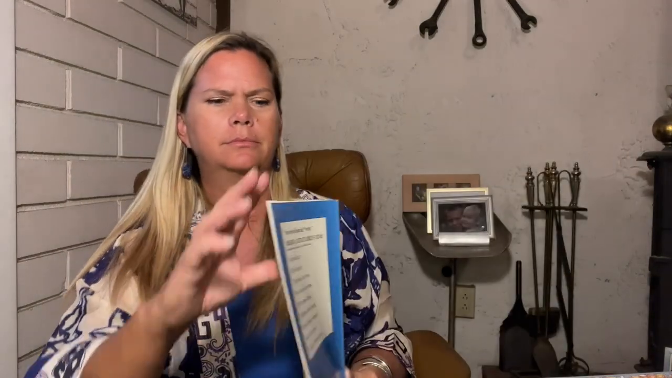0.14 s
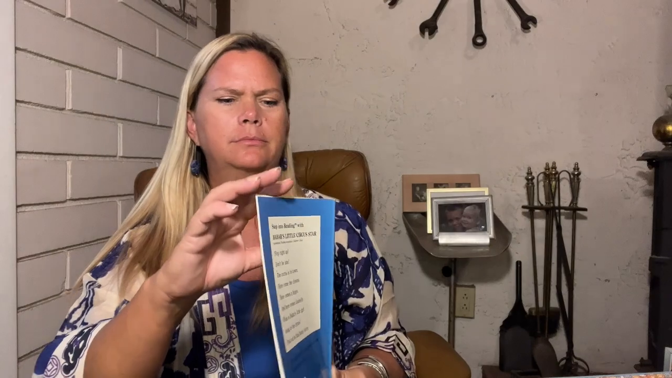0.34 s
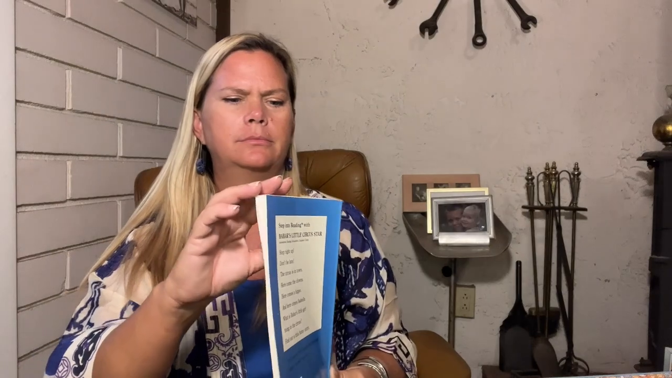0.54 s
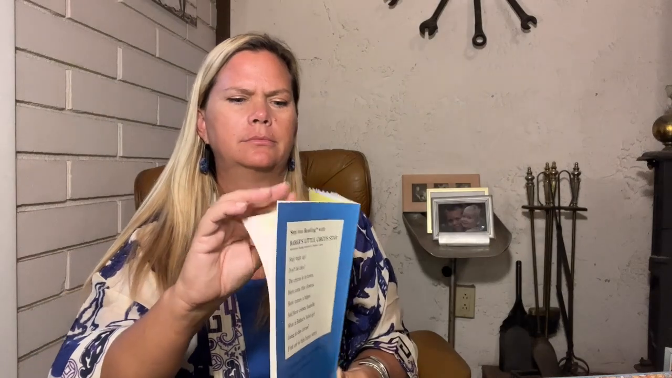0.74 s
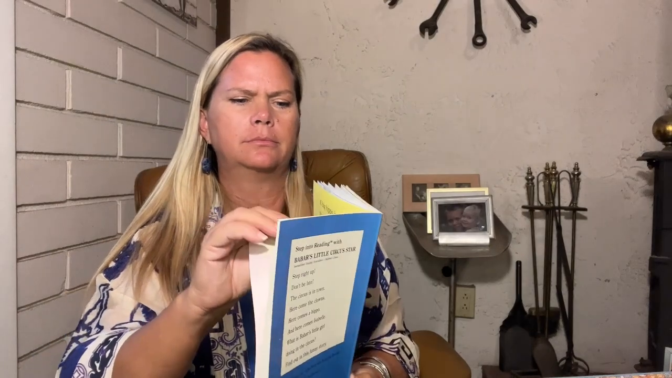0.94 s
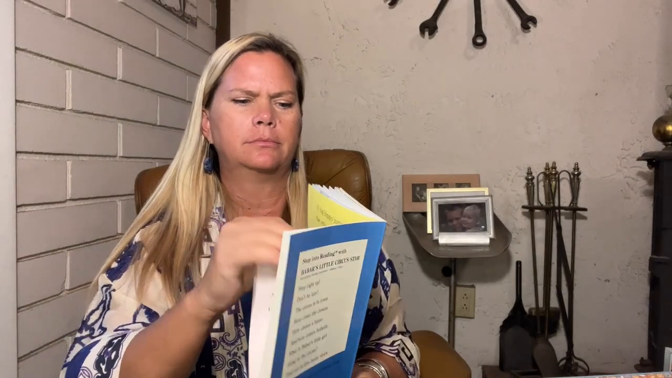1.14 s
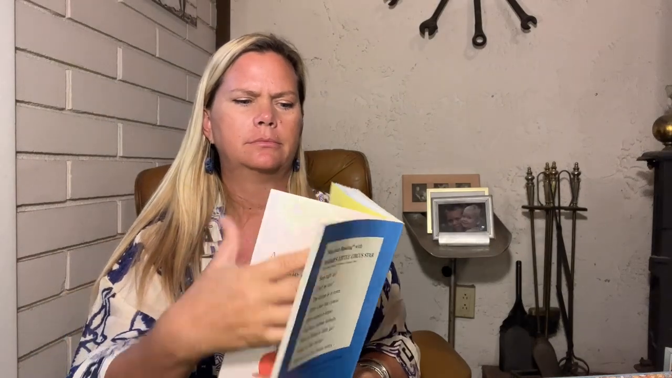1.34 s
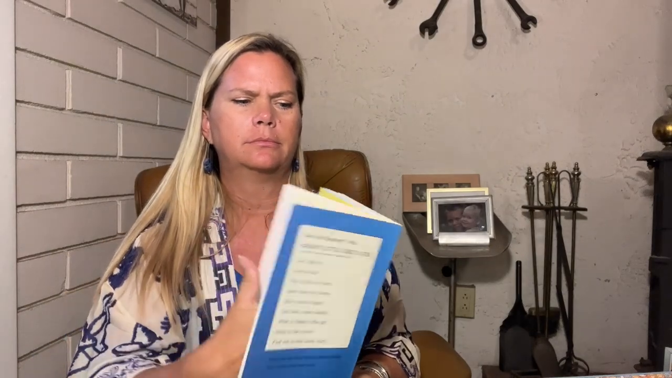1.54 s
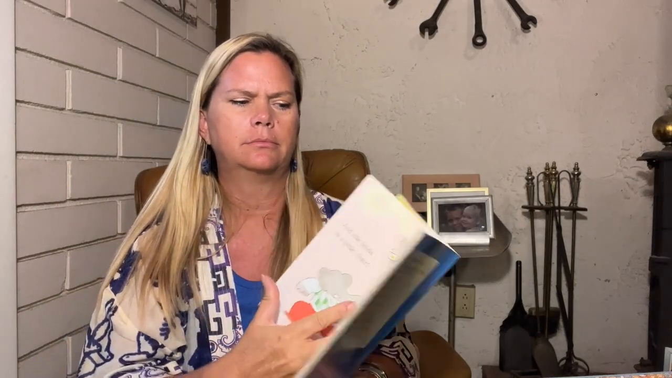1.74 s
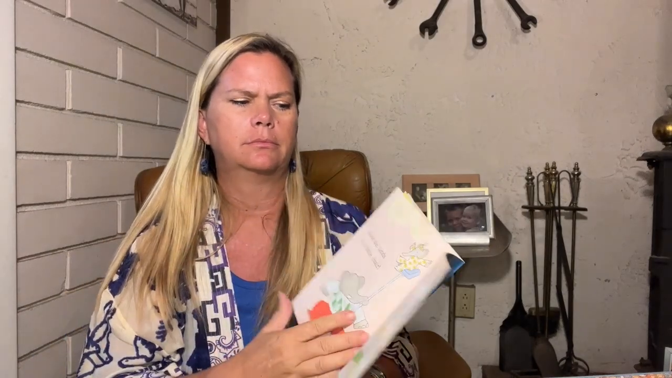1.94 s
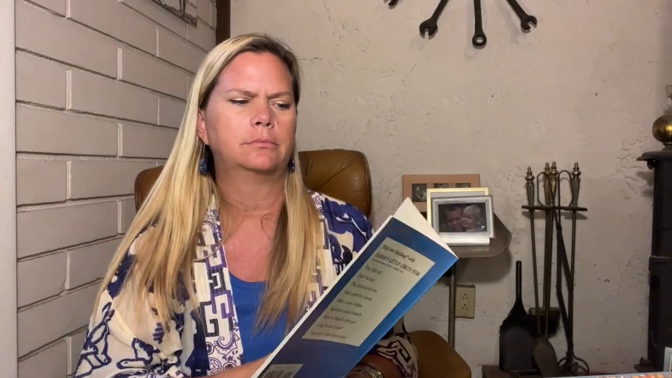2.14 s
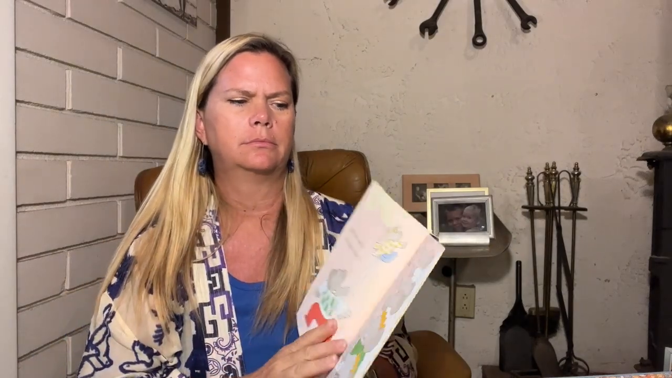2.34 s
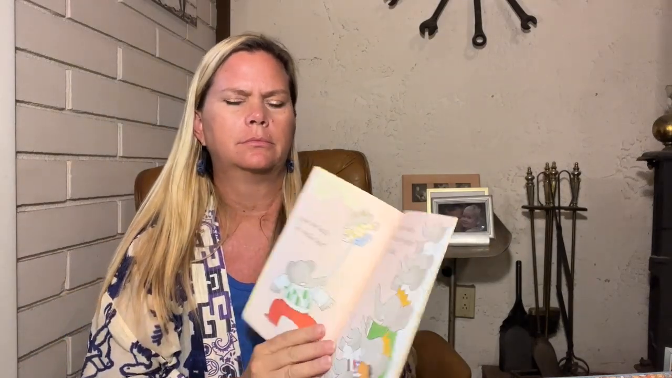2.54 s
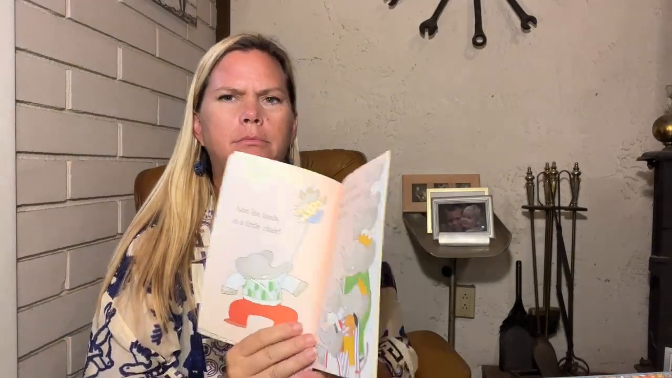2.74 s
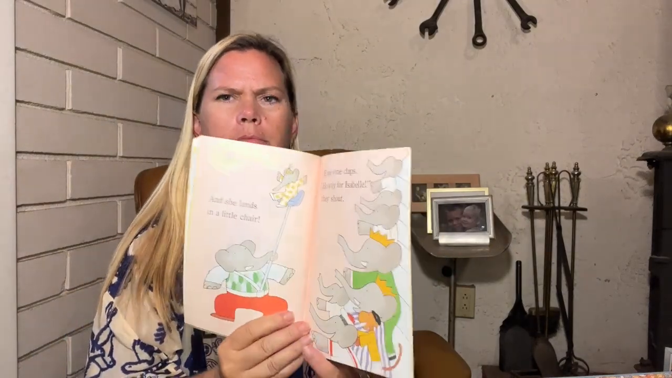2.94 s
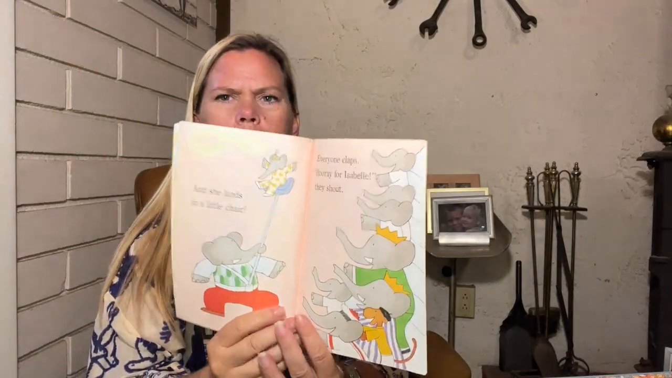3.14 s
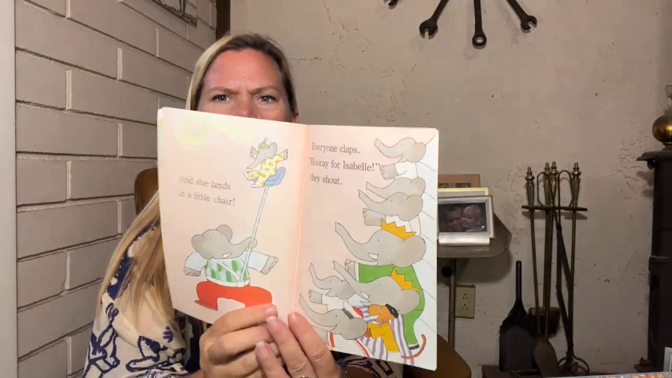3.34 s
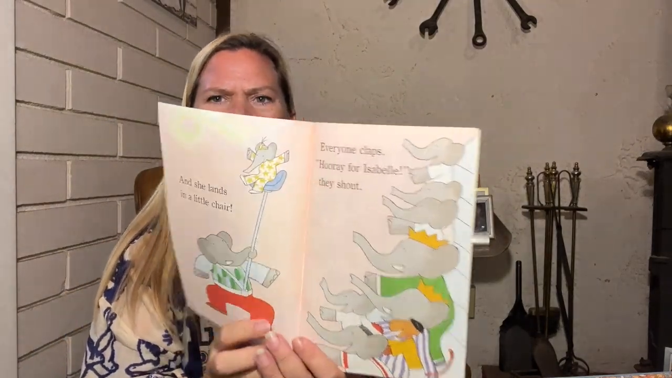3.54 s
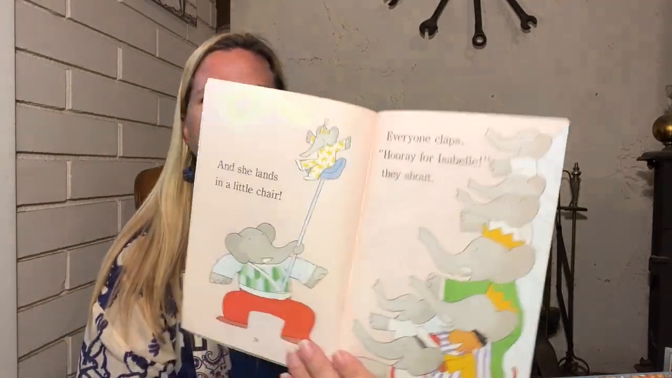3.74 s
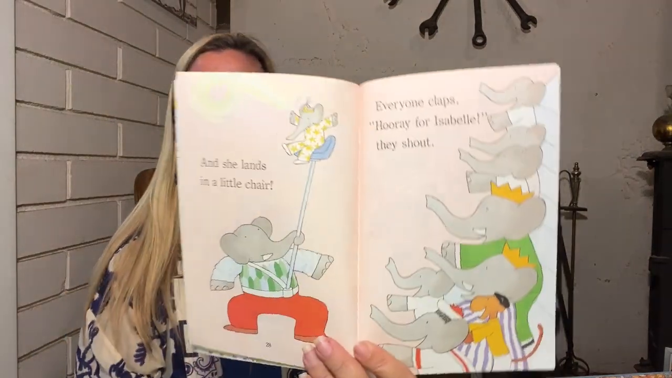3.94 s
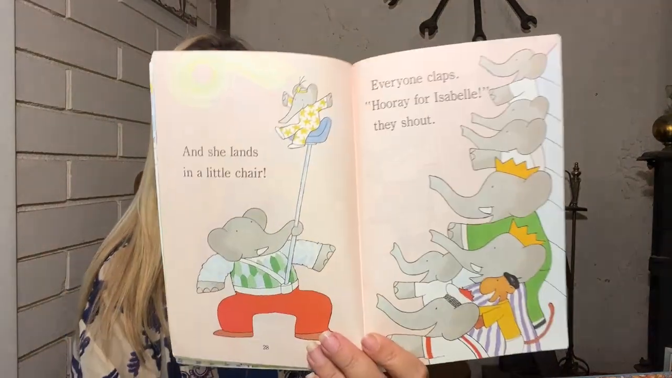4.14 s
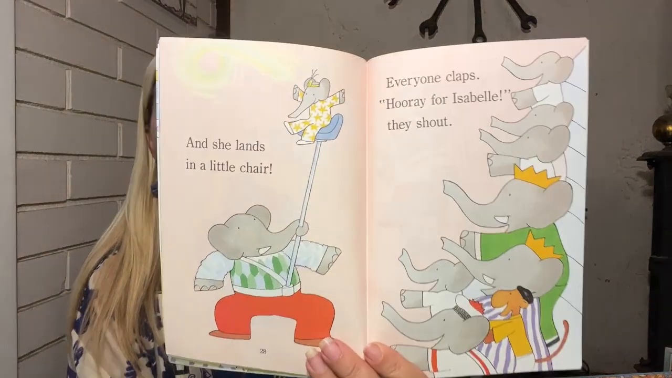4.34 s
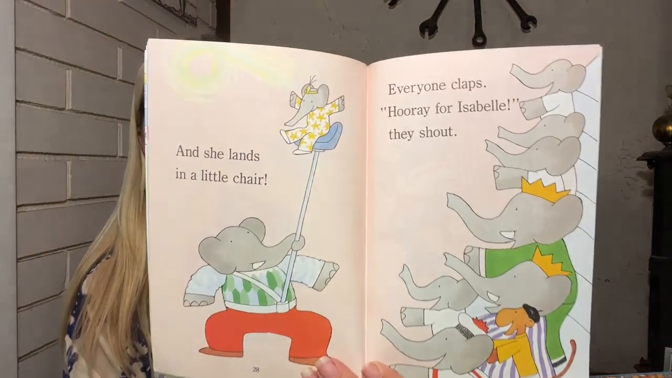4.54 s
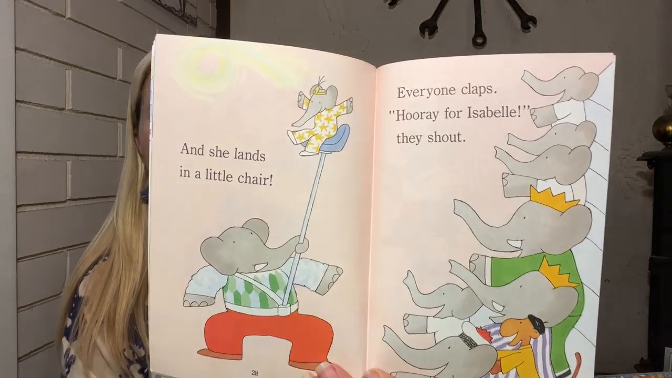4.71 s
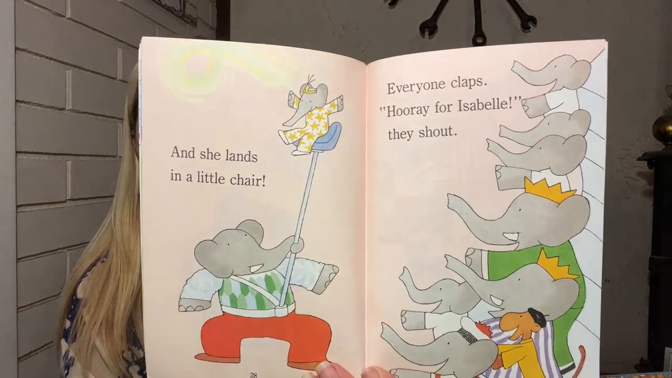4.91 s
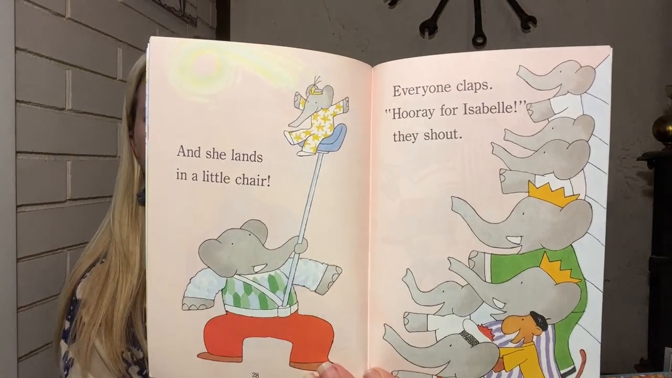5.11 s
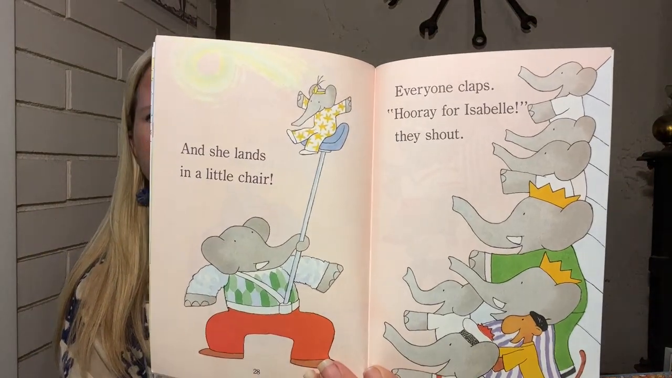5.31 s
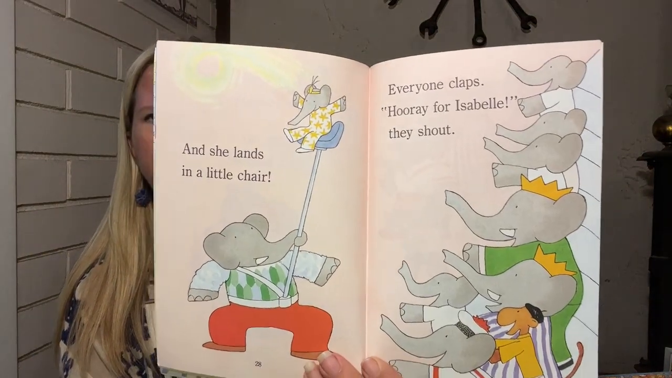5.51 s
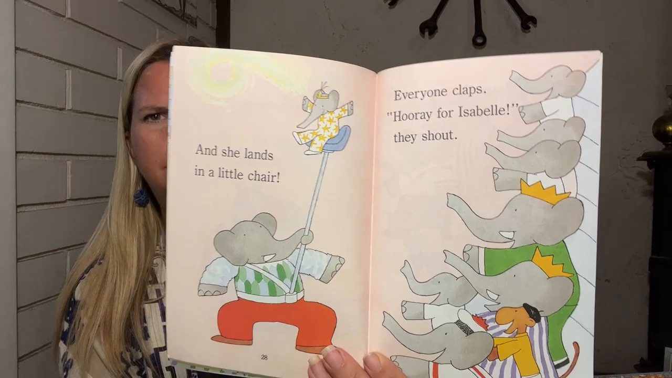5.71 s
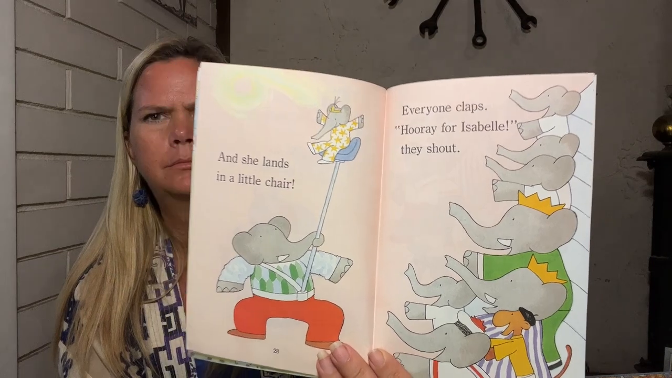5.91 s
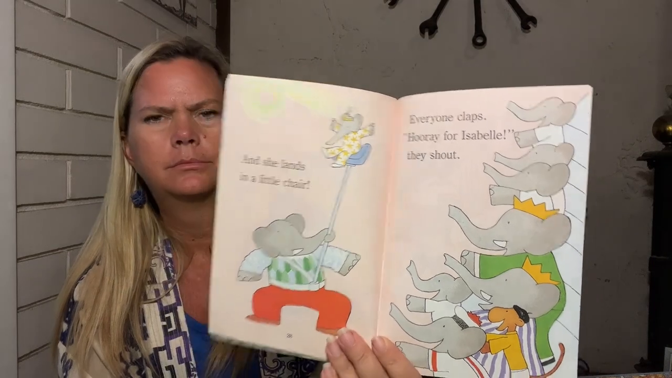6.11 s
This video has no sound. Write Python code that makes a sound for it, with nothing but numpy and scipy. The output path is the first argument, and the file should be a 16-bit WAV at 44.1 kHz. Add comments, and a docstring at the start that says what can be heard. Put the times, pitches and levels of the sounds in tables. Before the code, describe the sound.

Fingers feel along a picture book's page, it snaps over with a papery crack, then light rustles and knocks settle into quiet room hum.

```python
"""In a quiet room, close to two closely spaced microphone ports, a reader turns a picture-book page.
Fingers feel along the edges, the sheet snaps free, flops over and is pressed flat; the book is swung round and raised.
Clumped clicks make the rustle, decaying sines the snaps and cover knocks, gliding sines the rasps.
Narrow noise bands make thin whistles of skin on paper; shaped noise and wavering sines make the ventilation.
Sparse reflections give the room."""
import sys
import numpy as np
from scipy import signal
from scipy.fft import rfft, irfft, next_fast_len
from scipy.io import wavfile
from scipy.ndimage import uniform_filter1d

SR = 44100
rng = np.random.default_rng(int(sys.argv[2]) if len(sys.argv) > 2 else 0)


def inscribe(sig):
    """Save sig as 16-bit PCM at rate SR to the path in sys.argv[1].

    A 1-D sig is mono; a 2-D sig holds one channel per row.
    Samples are clipped to [-1, 1] before scaling.
    """
    pcm = np.round(np.clip(np.atleast_2d(sig).T, -1, 1) * 32767)
    wavfile.write(sys.argv[1], SR, pcm.astype(np.int16))


N = 272097
TIME, FREQS = np.arange(N) / SR, np.fft.rfftfreq(N, 1 / SR)

# How the two ports hear the nearby book.
# Each row: frequency in Hz, likeness of the ports (0 to 1), phase by which the left leads in radians.
PORTS_BOOK = [(99, 1, 9.5), (690, 0.26, -1), (1400, 0.96, -0.53), (3330, 0.92, -1.37), (5640, 0.5, -1.7),
              (6300, 0, -3), (7820, 0.8, -4.5), (13900, 0.2, -3), (15000, 0.97, 1)]
# Dry skin chafes the glossy page with a thin whistle.
# Each row: middle in seconds, whistle in dB before the layer's trim, half-length in seconds,
# whistle pitch in Hz, edge fizz in dB re whistle.
CHAFES = [(2.499, -50, 0.024, 6840, -3.5), (2.629, -46, 0.013, 7070, -2), (2.894, -53, 0.0085, 6780, -1),
          (3.06, -57, 0.005, 6730, -3.5), (3.11, -70, 0.0093, 6630, -18),
          (3.553, -45.5, 0.014, 6300, -13.5), (4.763, -71, 0.017, 6180, -15),
          (4.827, -68.5, 0.005, 6200, -17), (5.425, -71, 0.011, 6300, -22),
          (5.486, -76.5, 0.014, 5900, -25)]

FINGER_SHAPE = 1.14  # how a fingertip touch swells and dies: 1 = pointed, 2 = rounded like a bell
FINGER_RELEASE = 1.32  # a fingertip lets go this many times more slowly than it bites


def amp(db):
    """Decibels to gain."""
    return 10 ** (np.asarray(db) / 20)


def unit(x):
    """Scales to rms 1."""
    return x / np.sqrt(np.mean(x ** 2) + 1e-20)


def read(table, hz, axis=1):
    """One column of a table, interpolated along log frequency."""
    columns = np.transpose(table)
    return np.interp(np.log(hz + 1), np.log(columns[0] + 1), columns[axis])


def drift(per_s):
    """Smooth random wander of rms 1 that changes about per_s times a second."""
    size = next_fast_len(N, real=True)
    smoothing = 1 + (np.fft.rfftfreq(size, 1 / SR) / per_s) ** 4
    wander = irfft(rfft(rng.standard_normal(size)) / smoothing, size)
    return unit(wander[:N])


def at_ports(pair, colour, ports):
    """Colours two unrelated signals and blends them into what the left and right ports hear, rms 1."""
    left, other = rfft(pair) * amp(read(colour, FREQS))
    like = np.clip(read(ports, FREQS), -1, 1)
    blend = like * left + np.sqrt(1 - like ** 2) * other
    right = blend * np.exp(-1j * read(ports, FREQS, axis=2))
    return unit(irfft(np.array([left, right]), N))


def ring(hz, gain, t60, rise_s, lead_s):
    """Modes set swinging by one blow; the swing at the right port runs lead_s ahead of the left."""
    t = np.arange(SR // 8) / SR
    swing = gain * amp(-60 * t / t60) * (1 - np.exp(-t / rise_s))
    return np.array([(swing * np.sin(2 * np.pi * hz * (t + lead))).sum(0)
                     for lead in (-lead_s / 2, lead_s / 2)])


def add(mix, s, sound):
    """Mixes a sound in at its time in seconds."""
    part = mix[:, round(s * SR):][:, :sound.shape[1]]
    part += sound[:, :part.shape[1]]


def stroke(at, rise_s, fall_s, shape):
    """Power of one touch: friction grows as the hand speeds up and fades as it slows."""
    return np.exp(-abs((TIME - at) / np.where(TIME < at, rise_s, fall_s)) ** shape)


def finger_stroke(at, half_s):
    """Power of one fingertip touch, which bites faster than it lets go."""
    return stroke(at, half_s, half_s * FINGER_RELEASE, FINGER_SHAPE)


def ventilation(air_db, rumble_db, waver_db):
    """Dull moving air, a wavering hum and a deep rumble that rises now and then."""
    # The diffuse room at the ports.
    # Each row: frequency in Hz, likeness of the ports (-1 to 1), phase by which the left leads in radians.
    diffuse_ports = [(50, 0.94, 0.0047), (123, 0.95, 0.0034), (224, 0.24, 0.017), (393, 0.57, 0),
                     (637, -0.27, 0.0068), (1000, -0.018, 0.016), (4830, -0.094, 0.0093),
                     (8010, -0.56, 0.012), (15000, 0.021, 0.012)]
    # Colour of the moving air. Each row: frequency in Hz, relative level in dB per Hz.
    air_colour = [(20, -99.5), (33, -97.5), (44, -82), (60, -75), (100, -79.5), (200, -77.5), (270, -78.5),
                  (410, -79.5), (510, -87), (750, -88.5), (1000, -93), (1400, -99.3), (1900, -101.1),
                  (2800, -110), (3500, -110.5), (4200, -118), (6300, -117.5), (8000, -123), (11000, -127),
                  (14000, -127), (16000, -138)]
    # The hum. Each row: frequency in Hz, middle level in dB rms before the balance of the ports.
    hum_tones = [(119.5, -63.5), (239.7, -66.5), (308, -69.5), (591, -76.5)]
    # Colour of the rumble. Each row: frequency in Hz, relative level in dB per Hz.
    rumble_colour = [(25, -28), (36, -22), (44, 7), (54, -0.5), (70, 1), (140, -29.5), (500, -100)]
    # Swells of the rumble. Each row: start and end in seconds, level in dB before the rumble's trim.
    rumble_swells = [(2.548, 3.85, -53.5), (4.653, 5.653, -52)]
    rest_db, ramp_s = -60.5, 0.18  # rumble between the swells, before its trim; length of a ramp

    air = amp(air_db) * at_ports(rng.standard_normal((2, N)), air_colour, diffuse_ports)
    hum = 0
    for hz, db in hum_tones:
        level = amp(db + waver_db * drift(2.4)) * np.sqrt(2)
        hum = hum + level * np.sin(2 * np.pi * hz * TIME + .5 * drift(3.5))
    deep = at_ports(rng.standard_normal((2, N)), rumble_colour, diffuse_ports)
    swells = 0
    for start, end, db in rumble_swells:
        inside_s = np.minimum(TIME - start, end - TIME)
        swells = swells + amp(db) * np.clip(inside_s / ramp_s + .5, 0, 1)
    return air + hum + deep * amp(rumble_db) * np.hypot(amp(rest_db), swells)


def room(x, gap_s):
    """Sparse wall reflections that die faster in the treble."""
    # Reverberation. Each row: frequency in Hz, time to fall by 60 dB in seconds.
    room_t60 = [(150, 0.52), (1000, 0.57), (4000, 0.35), (15000, 0.022)]
    count = SR // 2
    taps = rng.standard_normal((2, count)) * (rng.random((2, count)) < 4000 / SR)
    taps = taps * (TIME[:count] > gap_s)
    hz, t, z = signal.stft(taps, SR, nperseg=256)
    decay = amp(-60 * t / read(room_t60, hz)[:, None])
    tail = signal.istft(z * decay, SR, nperseg=256)[1]
    return signal.fftconvolve(x, tail / np.linalg.norm(tail[0]), axes=1)[:, :N]


def knocks(rise_s, lead_s):
    """A fingertip lands on the cover, which gives a few quickly damped swings."""
    # Fingers knock on the held book; the pitch depends on where they land.
    # Each row: start in seconds, level in dB, pitch in Hz, time to fall by 60 dB in seconds.
    cover_blows = [(2.041, -33.5, 1274, 0.012), (2.1005, -49, 387, .03), (2.645, -43.5, 1200, 0.024),
                   (2.6933, -46, 1420, .02), (2.707, -47, 1290, 0.026), (2.8023, -45, 202, .04),
                   (3.671, -38.5, 1760, .012), (3.6745, -39.5, 769, 0.011), (3.6773, -40, 402, 0.025)]
    # Modes of the damped cover. Each row: multiple of the pitch, level in dB re the blow.
    cover_modes = [(.86, -10), (1, 0.5), (1.33, -9), (2.08, -10)]
    multiple, db = np.transpose(cover_modes)[:, :, None]
    out = np.zeros((2, N))
    for s, blow_db, hz, t60 in cover_blows:
        add(out, s, ring(hz * multiple, amp(blow_db + db), t60, rise_s, lead_s))
    return out


def snaps(rise_s, lead_s):
    """Each buckle or tap of the sheet rings the stiff page's modes briefly."""
    # Each row: start in seconds, level in dB, centre of the blow's colour in Hz, its width in octaves,
    # share of the ring time that the fingers leave.
    page_blows = [(0.5031, -37.5, 1090, 0.32, 0.58), (0.6005, -38, 3600, 0.86, .5),
                  (0.7625, -39.5, 3100, .9, 0.63), (0.848, -47, 1000, 0.83, .8),
                  (1.1354, -28, 2376, .4, .53), (1.1379, -17.5, 1759, 1.05, 0.9),
                  (1.1396, -30.5, 2253, 3.1, 0.46), (1.142, -29, 266, 0.36, 0.8),
                  (1.1425, -37.5, 1617, 1.4, .48), (1.1716, -38.5, 1510, 3, 0.89),
                  (1.1762, -33, 2450, 0.22, 1), (1.266, -42, 1240, 0.58, 1), (1.269, -34, 750, 0.55, 0.98),
                  (1.314, -45, 1210, 0.64, 0.84), (1.507, -42.5, 1500, 0.44, 1),
                  (2.182, -43, 2000, 1.3, 0.97), (2.202, -42, 2500, 0.62, .6)]
    # Modes of the stiff page. Each row: frequency in Hz, level in dB re the blow,
    # time to fall by 60 dB in seconds when the fingers leave it free.
    page_modes = [(288, -7.5, 0.078), (374, 2.9, 0.043), (792, -15.1, 0.08), (915, -6.5, 0.054),
                  (1166, -16.5, 0.051), (1400, -8, 0.033), (1480, -5.5, 0.024), (1603, -10, 0.04),
                  (1990, -1, 0.014), (2250, -11.5, .05), (2400, -6.5, 0.024), (2608, -16.5, 0.072),
                  (3300, 4.5, 0.011), (3590, -11, .02), (4100, -5.5, 0.027), (4695, -4, .025),
                  (5500, 3, 0.0091), (6400, -4, .008)]
    hz, db, t60 = np.transpose(page_modes)[:, :, None]
    out = np.zeros((2, N))
    for s, blow_db, centre_hz, octaves, free in page_blows:
        colour = np.exp(-.5 * (np.log2(hz / centre_hz) / octaves) ** 2)
        add(out, s, ring(hz, amp(blow_db + db) * colour, t60 * free, rise_s, lead_s))
    return out


def rasps(flutter_db, flutter_per_s):
    """Stick and slip drives one resonance of the bowed sheet, which glides as the bend changes."""
    # Each row: middle in seconds, peak amplitude in dB before flutter, half-length in seconds,
    # resonance in Hz, glide in Hz per second, width in Hz.
    drags = [(0.71, -49, 0.007, 2600, 0, 210), (0.61, -62, .016, 2700, 0, 110),
             (0.77, -54, 0.022, 3350, -3000, 260), (.845, -50.5, 0.0081, 5100, 0, 380),
             (1.255, -51, 0.029, 1590, 2498.5, 202), (1.302, -54, 0.025, 1790, 1497.5, 100),
             (1.30, -58, 0.0248, 4000, 1504, 220), (1.077, -58.5, 0.03, 1430, -1, 265),
             (1.05, -56.5, .05, 3200, 1, 300), (1.07, -56, 0.047, 4280, -0.5, 330),
             (2.188, -49.5, 0.014, 1110, 1, 170), (2.215, -52.5, 0.036, 2450, 0.5, 250),
             (2.21, -58, .028, 3250, -1, 510), (3.57, -59, 0.046, 1300, 0.5, 281),
             (3.669, -50, 0.0054, 1290, -1, 170)]
    shape = 3.8  # a rasp holds its strength, then stops quickly
    out = np.zeros((2, N))
    for at, db, half, hz, glide, width in drags:
        bend = glide * np.clip(TIME - at, -2 * half, 2 * half)
        pitch = hz + bend + width * drift(width) / 2
        flutter = flutter_db * drift(flutter_per_s)
        level = amp(db + flutter) * np.sqrt(stroke(at, half, half, shape))
        phase = 2 * np.pi * np.cumsum(pitch) / SR
        out += level * np.sin([phase, phase - read(PORTS_BOOK, hz, axis=2)])
    return out


def whistles():
    """Each chafe sings in one narrow noise band, shifted to its own pitch."""
    # Colour of the whistle before the shift. Each row: frequency in Hz, relative level in dB per Hz.
    whistle_colour = [(4500, -54), (6200, -14), (6850, 13), (7500, -3.5), (10000, -25)]
    peak_hz = 6820  # the peak of that colour
    band = signal.hilbert(at_ports(rng.standard_normal((2, N)), whistle_colour, PORTS_BOOK))
    touch = 0
    for at, db, half, hz, _ in CHAFES:
        shift = np.exp(2j * np.pi * (hz - peak_hz) * (TIME - at))
        touch = touch + amp(db) * np.sqrt(finger_stroke(at, half)) * shift
    return (band * touch).real


def slips(per_s, spread_db, clump_db, clumps_per_s):
    """Paper fibres catch and let go: tiny clicks of uneven size that come in clumps."""
    size = amp(spread_db * np.minimum(rng.exponential(1, N), 4))
    clicks = size * (rng.random(N) < per_s / SR)
    return rng.standard_normal((2, N)) * clicks * amp(clump_db * drift(clumps_per_s))


def bending(pair, patchy_db):
    """As the paper bends, its resonances come and go in patches a few hundred Hz wide."""
    z = signal.stft(pair, SR, nperseg=512, noverlap=384)[2]
    patches = uniform_filter1d(rng.standard_normal(z.shape[1:]), size=3, axis=0)
    patches = uniform_filter1d(patches, size=18, axis=1)
    return signal.istft(z * amp(patchy_db * unit(patches)), SR, nperseg=512, noverlap=384)[1][:, :N]


def touches():
    """Strength of flexing, friction and edge fizz: the powers of all slides, scuffs and chafes add up."""
    # Hand movements that slide paper on paper or skin.
    # Each row: moment of greatest speed in seconds, friction in dB before the layer's trim,
    # speeding up and slowing down in seconds, flexing and edge fizz in dB re friction.
    hand_slides = [(.36, -69, 0.079, 0.17, 1, -10), (.59, -58, 0.016, 0.0097, 1, 2),
                   (.65, -62, 0.025, 0.053, -8, -14), (.755, -59.5, 0.036, 0.056, -2.5, -11),
                   (.842, -51, 0.011, 0.025, -4, -10), (.932, -60, 0.024, 0.01, 0.5, -16),
                   (1.035, -53.5, 0.017, 0.029, -11, -22), (1.10, -52, 0.04, 0.038, -3.5, -18),
                   (1.174, -45, 0.024, 0.017, -4, -6.5), (1.275, -51.5, 0.1, 0.036, 3, -7),
                   (1.508, -53, 0.038, 0.014, -5, -0.5), (1.61, -61.5, 0.1, 0.12, -1, -1),
                   (2.08, -64, 0.12, 0.08, 0.5, -12), (2.194, -51.5, 0.021, 0.027, 4.5, -6),
                   (2.265, -55, 0.033, 0.039, -13, 0), (2.352, -56.5, 0.033, 0.014, -9, -11),
                   (2.51, -60, 0.067, 0.033, -3, -17), (2.63, -47, 0.057, 0.024, -16, -18),
                   (2.697, -56.5, 0.027, 0.027, -4, -6.5), (3.289, -60.5, 0.085, 0.1, -5, -6.5),
                   (3.51, -55.5, 0.028, 0.013, -9, -12), (3.575, -54, 0.032, 0.037, -6, -8),
                   (3.668, -53.5, 0.059, 0.0053, -7, 3), (3.70, -73.5, 0.018, 0.044, -2, -1),
                   (4.79, -82, 0.047, 0.046, -2.5, -13), (5.51, -79.5, .05, 0.044, 6.5, -17)]
    # Short fingertip scuffs. Each row: middle in seconds, friction in dB before the layer's trim,
    # half-length in seconds, flexing in dB re friction.
    finger_scuffs = [(.227, -65, 0.0017, -6), (0.2967, -47.5, 0.001, -6), (0.329, -51.5, 0.00096, -7),
                     (0.335, -47, 0.00065, -19), (0.351, -54.5, 0.0022, -14), (0.3805, -48, 0.001, -5),
                     (0.5035, -48.5, 0.0013, 0), (0.599, -40, 0.0025, -4), (0.7624, -46.5, 0.0005, -8),
                     (0.939, -55.5, 0.0022, 4.5), (1.1379, -34, .0004, -2.5),
                     (1.1404, -31.5, 0.00046, -7.5), (1.168, -43.5, 0.0022, -9), (2.189, -48, .003, 4),
                     (2.228, -49.5, 0.0043, -9), (2.615, -46, 0.0018, -17), (2.641, -47, 0.004, -9),
                     (3.67, -45.5, 0.00057, -6)]
    slide_shape = 1.256  # 1 = pointed, 2 = rounded like a bell
    scuff_fizz_db = -7.5  # re the scuff's friction
    chafe_rub_db = -5  # plain friction of a chafe, re its whistle

    power = np.zeros((3, N))
    for at, db, rise, fall, flex, fizz in hand_slides:
        parts_db = db + np.array([[flex], [0], [fizz]])
        power += amp(parts_db) ** 2 * stroke(at, rise, fall, slide_shape)
    for at, db, half, flex in finger_scuffs:
        parts_db = db + np.array([[flex], [0], [scuff_fizz_db]])
        power += amp(parts_db) ** 2 * finger_stroke(at, half)
    for at, db, half, _, fizz in CHAFES:
        parts_db = db + np.array([[chafe_rub_db], [fizz]])
        power[1:] += amp(parts_db) ** 2 * finger_stroke(at, half)
    return np.sqrt(power)


def rustle(flex_db, held_db, friction_db, hand_db, fizz_db, chafe_db, laid_flat_s):
    """Slips under each touch sound as a papery body, a hiss and a fine fizz; chafes add whistles."""
    # Five colours; each row: frequency in Hz, relative level in dB per Hz.
    flex_colour = [(120, -37), (330, -7.5), (470, 1.5), (620, -4.5), (900, -1), (1150, -4), (1500, -5.5),
                   (1820, -3), (2300, -6.5), (3400, -8), (4600, -23), (8000, -55)]  # the loose sheet as it flexes
    held_colour = [(120, -31), (400, -18), (750, 1), (1000, -2.5), (1300, -1.5), (1750, 1), (2350, -10),
                   (3100, -13), (4600, -5.5), (8000, -45)]  # the whole book as it flexes in the hands
    friction_colour = [(900, -40), (2200, -4), (3200, -1), (4400, 0), (5600, 0.5), (6800, 2.5), (7600, -1),
                       (8500, -0.5), (9600, -20), (13000, -26)]  # hiss of paper on paper
    hand_colour = [(1500, -17), (2300, -10), (3200, -4.5), (4300, -9), (5400, -4.5), (6600, -4),
                   (7400, -3.5), (8400, -6), (9600, -25), (13000, -31)]  # hiss of a hand on the held book
    fizz_colour = [(6000, -35), (8500, -6), (9800, 0), (11000, 1), (12300, -1), (13700, -1), (14800, -5),
                   (16000, -4)]  # fine fizz of the paper's edges

    body, hiss, edge = touches()
    coarse = bending(slips(per_s=2200, spread_db=0.8, clump_db=0.5, clumps_per_s=110), patchy_db=3.5)
    fine = bending(slips(per_s=12000, spread_db=0.5, clump_db=1.0, clumps_per_s=28), patchy_db=3.0)
    sheet = amp(flex_db) * body * at_ports(coarse, flex_colour, PORTS_BOOK)
    sheet = sheet + amp(friction_db) * hiss * at_ports(fine, friction_colour, PORTS_BOOK)
    book = amp(held_db) * body * at_ports(coarse, held_colour, PORTS_BOOK)
    book = book + amp(hand_db) * hiss * at_ports(fine, hand_colour, PORTS_BOOK)
    # once the page lies flat, the whole book resounds instead, after a 0.1 s crossfade
    held = np.clip((TIME - laid_flat_s) * 10, 0, 1)
    fizz = amp(fizz_db) * edge * at_ports(fine[::-1], fizz_colour, PORTS_BOOK)
    return (1 - held) * sheet + held * book + fizz + amp(chafe_db) * whistles()


def scene():
    """The book close by, its reflections, and the room's own noise, a little stronger on the right."""
    paper = rustle(flex_db=-2.0, held_db=1.0, friction_db=-0.5, hand_db=-1.0,
                   fizz_db=2.5, chafe_db=-4.5, laid_flat_s=2.24)
    paper = paper + rasps(flutter_db=3.0, flutter_per_s=180)
    cracks = snaps(rise_s=0.00032, lead_s=.00003) + knocks(rise_s=0.00041, lead_s=.00003)
    echoes = room(amp(-12.0) * paper + amp(-15.0) * cracks, gap_s=0.0036)
    background = amp([[-.5], [.5]]) * ventilation(air_db=-52.5, rumble_db=-4.5, waver_db=-0.5)
    return paper + cracks + echoes + background


def record(dry):
    """Flips the shared part of a band around 11 kHz in the right channel, so that it sounds wide
    and hollow; then cuts off the treble."""
    # Corners in Hz of the flipped band: it fades in from the first to the second
    # and out from the third to the fourth.
    flipped_hz = (8900, 9700, 12400, 13200)
    edge_hz = 15950  # upper band limit
    flipped = np.interp(FREQS, flipped_hz, (0, .98, .98, 0))
    common = irfft(rfft(dry.mean(0)) * flipped, N)
    channels = dry - common + common * np.array([[1], [-1]])
    lowpass = signal.firwin(511, edge_hz, window=("kaiser", 9), fs=SR)
    return signal.oaconvolve(channels, lowpass[None], "same")


dry = scene()
out = record(dry)
inscribe(out)
```